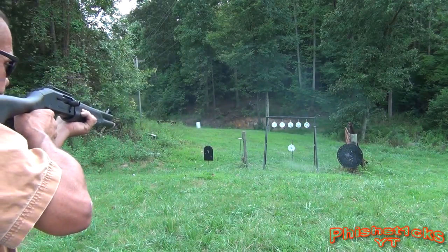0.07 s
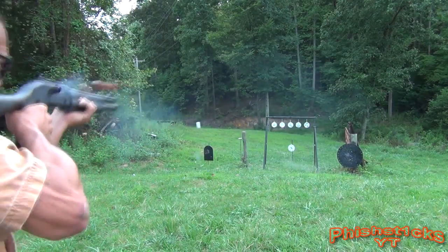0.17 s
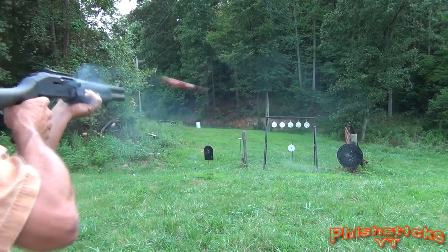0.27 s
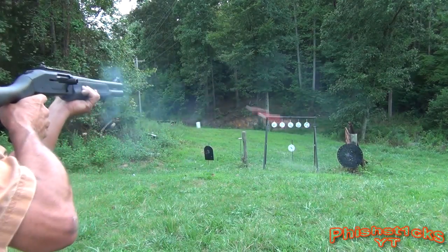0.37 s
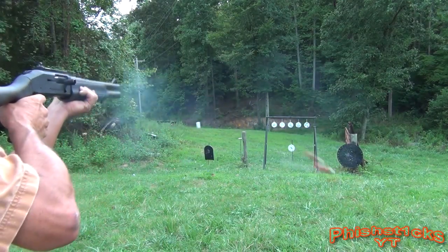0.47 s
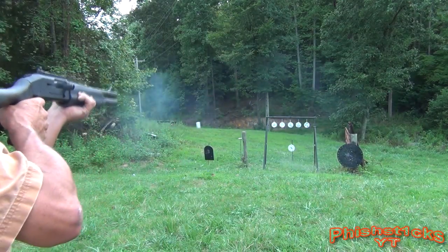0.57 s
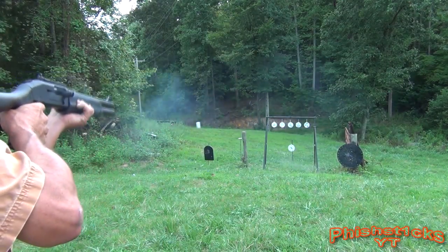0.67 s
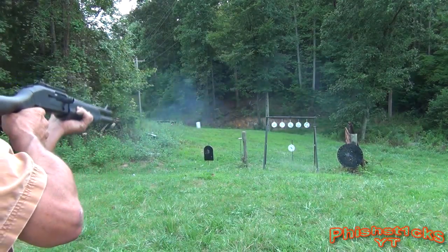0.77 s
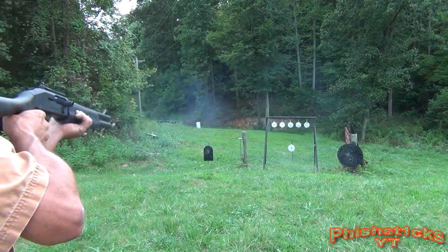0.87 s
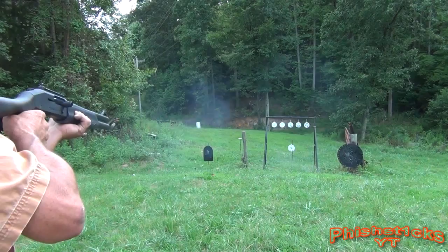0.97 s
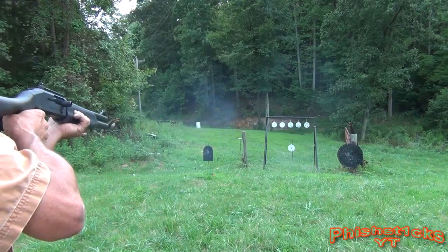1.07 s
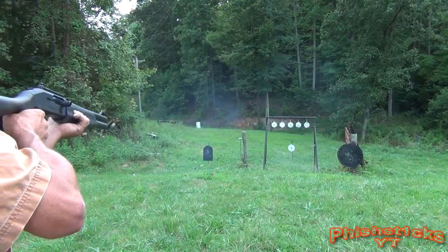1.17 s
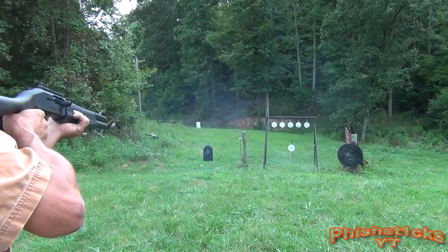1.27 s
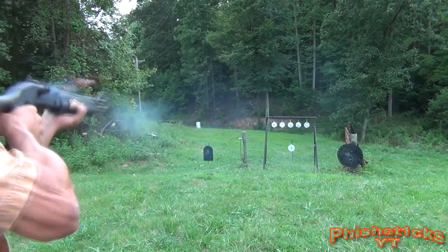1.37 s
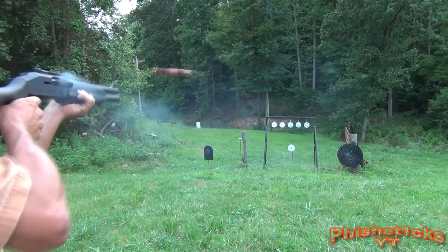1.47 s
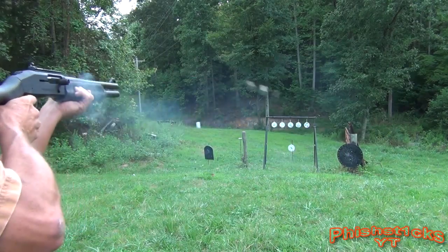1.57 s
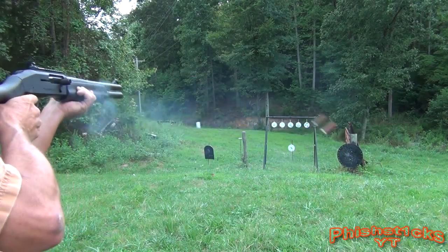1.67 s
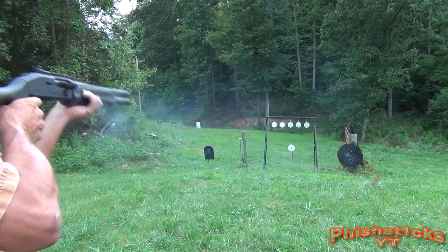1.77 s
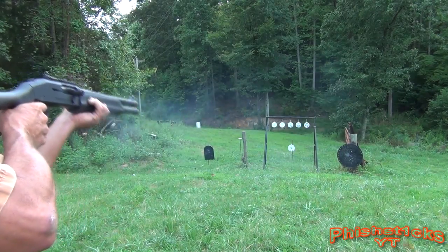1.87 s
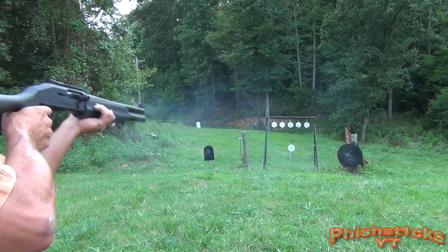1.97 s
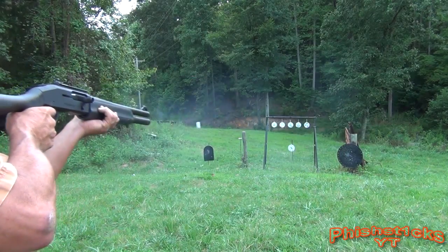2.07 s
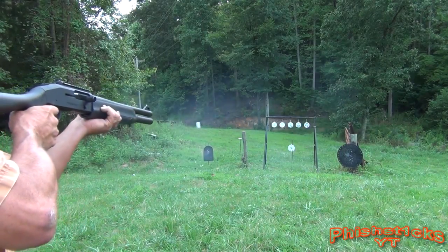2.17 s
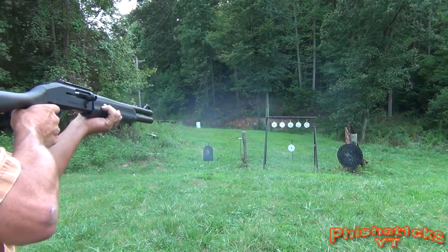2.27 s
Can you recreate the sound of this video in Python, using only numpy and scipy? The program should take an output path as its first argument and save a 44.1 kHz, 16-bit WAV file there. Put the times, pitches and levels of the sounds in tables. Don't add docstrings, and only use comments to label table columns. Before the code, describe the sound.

A close semi-automatic shotgun fires two shots about a second apart on a grassy range; each flat, bright, overloaded blast is followed by a bolt slam, ringing steel and echoes rolling back from surrounding woods.

```python
import sys
import numpy as np
from scipy import signal
from scipy.fft import rfft, irfft
from scipy.io import wavfile
from scipy.ndimage import uniform_filter1d

SR = 44100
rng = np.random.default_rng(int(sys.argv[2]) if len(sys.argv) > 2 else 0)


def to_linear_factor(level_db):
    exponent = np.asarray(level_db, float) / 20
    return 10 ** exponent


def wav_out(sig):
    wavfile.write(sys.argv[1], SR, np.round(np.clip(np.atleast_2d(sig).T, -1, 1) * 32767).astype(np.int16))


N = 101430

SHOT_S = [
    .2015,
    1.41905,
]
# (echo level [dB], roar level [dB], bolt level [dB])
SHOT_LEVELS = [
    (0, -13, -10.5),
    (-.5, -12.5, -11),
]
# (woods level [dB], recovery [dB per s])
RECOVERY = [
    (1.5, 0),
    (0, -8),
]

# (frequency [Hz], level [dB per Hz])
FIELD_TONE = [(40, -54), (110, -26.5), (250, -16.5), (479, -3), (1100, -13.5), (2200, -27), (3650, -36),
              (15000, -45)]
# (frequency [Hz], side against mid [dB])
FAR_WIDTH = [(60, -32), (180, -51), (550, -18.5), (1650, -13), (4970, -11.5), (15000, -22.5)]

# (frequency [Hz], level [dB per Hz])
WOODS_TONE = [(40, -38), (200, -32.5), (372, -3), (542, -1), (760, -6.5), (1180, -5), (4000, -15.5),
              (9000, -26), (15000, -53.5)]
# (frequency [Hz], time to fall 60 dB [s])
WOODS_T60 = [(100, 1.5), (250, 0.9), (450, 2.78), (1000, 2.27), (2000, 1.69), (4000, 1.1), (6000, 0.99),
             (12000, 0.675)]
# (time after shot [s], level [dB])
WOODS_SWELL = [(0, -14), (.15, -14), (.25, -11), (.3, -6), (.37, -3.5), (.45, -1.5), (.55, 0)]

ECHO_S = [.0028, .027, .0575, .0743, .0775, .0815, .098, .1065, .1205, .127, .172, .1835, .2552, .2585,
          .2695, .283, .288, .2975, .308, .3275, .3385, .3425, .3465, .354, .361, .387, .392, .4365, .4445,
          .450]
ECHO_HZ = [1320, 1640, 850, 1050, 400, 880, 1120, 600, 1130, 1230, 910, 810, 850, 800, 990, 850, 650, 1190,
           600, 800, 900, 1000, 750, 700, 900, 590, 580, 800, 900, 1000]
# (level [dB], spread [s])
ECHO_LEVELS = [(-6, .001), (-17, .002), (-18, .002), (-6, .002), (-11, .003), (-5, .0015), (-16, .002),
               (-14, .002), (-14, .002), (-13, .002), (-16, .002), (-10, .004), (-6, .0015), (-11, .003),
               (-8, .003), (-18, .001), (-13, .003), (-14, .002), (-13, .001), (-10, .002), (-10, .003),
               (-7, .002), (-10, .005), (-13, .001), (-7, .002), (-13, .003), (-14, .002), (-11, .003),
               (-14, .004), (-14, .004)]
# (frequency [Hz], level [dB per Hz])
CLAP_TONE = [(50, -45), (120, -13), (400, 3), (1000, -2.5), (2000, -6), (4000, -13.5), (8000, -38),
             (14000, -58.5)]
# (time after shot [s], level [dB], length [s])
GLINTS = [
    (.127, -28, .01),
    (.243, -33, .03),
    (.336, -31, .018),
    (.36, -40, .005),
]

# (time [s], level [dB], length [s])
TICKS = [
    (0.34, -28, 0.00085),
    (0.88, -51, .03),
    (1.192, -58, 0.0031),
    (1.232, -65, 0.0014),
    (1.332, -62, .003),
    (1.549, -12, 0.0012),
    (2.168, -68, .01),
]
# (frequency [Hz], level [dB per Hz])
CLACK_TONE = [(290, -22.5), (500, -16.5), (8310, -6.5), (10500, -19), (11700, -6.5), (15200, -29.5),
              (16800, -41)]

FIRST_HZ = [6718, 6799, 7660, 7773, 8565, 8845, 9405, 5922, 4430, 10487, 5524, 11133, 11423, 11623]
SECOND_HZ = [5524, 5922, 6713, 6853, 7375, 8005, 9394, 10476, 10729, 11400, 11859, 13006, 13474, 14626]
LATE_HZ = [9410, 6802, 8856, 11149, 11429, 11547, 12145, 13700, 6720, 6860, 10530, 11430, 13474, 14626]
# (level [dB], start [s], hold [s])
FIRST_RING = [(-29, .33, .12), (-28, .31, .14), (-29, .33, .12), (-29, .33, .12), (-33, .3, .12),
              (-30, .3, .14), (-19, .288, .065), (-36, .31, .15), (-40, .3, .3), (-31, .31, .11),
              (-38, .39, .16), (-33, .31, .14), (-25, .295, .12), (-29, .33, .12)]
SECOND_RING = [(-36, 1.62, .11), (-28, 1.575, .075), (-21, 1.555, .095), (-25, 1.56, .09), (-29, 1.57, .08),
               (-31, 1.57, .08), (-31, 1.53, .08), (-29, 1.51, .1), (-29, 1.51, .1), (-25, 1.53, .08),
               (-29, 1.52, .09), (-30, 1.51, .05), (-33, 1.51, .05), (-30, 1.52, .05)]
LATE_RING = [(-38, .55, .17), (-55, .84, .11), (-58, .85, .12), (-60, .87, .15), (-55, .79, .07),
             (-62, .87, .1), (-61, .84, .07), (-75, .9, .16), (-43, 1.71, .14), (-52, 1.73, .14),
             (-63, 1.94, .1), (-63, 1.91, .13), (-69, 1.96, .09), (-70, 1.97, .09)]
# (frequency [Hz], level [dB], start [s], hold [s])
MORE_FIRST = [(3838, -43, .33, .25), (6541, -40, .31, .14), (7224, -38, .31, .14), (7596, -37, .32, .13),
              (8005, -33, .3, .17), (9405, -20, .385, .06), (10363, -33, .3, .11), (10422, -33, .3, .11),
              (10750, -36, .3, .13), (10912, -39, .3, .13), (11353, -36, .295, .12),
              (12139, -39, .295, .12), (12204, -36, .295, .11), (13754, -40, .29, .1)]
MORE_SECOND = [(5103, -34, 1.6, .05), (6288, -31, 1.595, .065), (7208, -31, 1.585, .065),
               (7745, -32, 1.53, .115), (8463, -37, 1.55, .09), (8548, -34, 1.55, .09),
               (8845, -34, 1.565, .075), (9238, -36, 1.54, .08), (10085, -39, 1.53, .08),
               (10896, -36, 1.56, .07), (11946, -34, 1.52, .07), (12866, -36, 1.51, .05),
               (13168, -37, 1.51, .05), (14836, -37, 1.52, .05)]
MORE_LATE = [(6799, -50, .5, .24), (7773, -50, .5, .12), (8010, -51, .5, .14), (8850, -52, .52, .12),
             (11623, -57, .5, .15), (12624, -59, .5, .13), (10422, -58, .5, .16), (9415, -68, .88, .12),
             (13684, -65, .5, .17), (14643, -74, .84, .1), (4430, -44, .55, .13), (7386, -52, 1.7, .14),
             (7741, -51, 1.7, .14), (5529, -50, 1.68, .14)]

# (frequency [Hz], level [dB per Hz])
ROAR_TONE = [(24, -59), (40, -36.5), (295, -10.5), (810, -16.5), (1070, -3), (5400, -4.5), (8510, 0),
             (15200, -6.5), (16800, -78.5)]
# (frequency [Hz], time to fall 60 dB [s])
ROAR_T60 = [(100, 1), (500, 1), (2000, 0.93), (6000, 0.74), (12000, 0.84), (16000, 0.51)]
# (frequency [Hz], lowest kept level [dB per bin])
KEPT_TREBLE = [(12000, -112), (13400, -101), (14200, -93), (15000, -86), (15400, -72), (16200, -60)]

WOODS_AT_S, WOODS_DB, WOODS_GRAIN_DB = 0.38, -22.5, 0
BOLT_S, HAMMER_S = .0835, -0.0061


def evened(x):
    return x / np.sqrt(np.mean(x ** 2) + 1e-20)


def read(points, hz):
    f, value = np.transpose(points)
    return np.interp(np.log(hz + 1), np.log(f + 1), value)


def add(mix, s, sound):
    part = mix[..., round(s * SR):][..., :sound.shape[-1]]
    part += sound[..., :part.shape[-1]]


def slow(count, smooth_s):
    size = max(round(smooth_s * SR), 1)
    smooth = uniform_filter1d(rng.standard_normal(count), size)
    return evened(uniform_filter1d(smooth, size))


def grit(count, grain_db, grain_s=0.0019):
    clumps = evened(to_linear_factor(grain_db * slow(count, grain_s)))
    return rng.standard_normal((2, count)) * clumps


def colour(x, tone, t60=None, at_s=0.):
    hz, t, z = signal.stft(x, SR, nperseg=512, noverlap=384)
    shape = evened(to_linear_factor(read(tone, hz)))[:, None]
    if t60:
        shape = shape * to_linear_factor(-60 * (t - at_s) / read(t60, hz)[:, None])
    return signal.istft(z * shape, SR, nperseg=512, noverlap=384)[1][..., :x.shape[-1]]


def causal(tone, size=2048):
    level_db = np.maximum(read(tone, np.fft.rfftfreq(size, 1 / SR)), -100)
    half = np.log(to_linear_factor(level_db))
    whole = np.r_[half, half[-2:0:-1]]
    pulse = np.fft.ifft(np.exp(np.conj(signal.hilbert(whole)))).real[:size // 2]
    return pulse / abs(pulse).max()


def widen(mid_side):
    mid, side = mid_side
    width = to_linear_factor(read(FAR_WIDTH, np.fft.rfftfreq(len(mid), 1 / SR)))
    side = irfft(rfft(side) * width, len(mid))
    return np.array([mid + side, mid - side])


def near(mid_side):
    side = to_linear_factor(-21) * mid_side[1]
    return np.array([mid_side[0] + side, mid_side[0] - side])


def field():
    t = np.arange(N) / SR
    fired = t > SHOT_S[0]
    wings = np.clip(np.sin(2 * np.pi * (31.5 * t + .72)) + 0.45, 0, 1)
    cricket = to_linear_factor(-64) * wings * (t > .036) * np.sin(2 * np.pi * 5850 * t)
    hum = to_linear_factor(-55) * np.sin(2 * np.pi * 191 * t)
    rumble = widen(to_linear_factor(-45.5) * colour(grit(N, grain_db=2), FIELD_TONE))
    return rumble * to_linear_factor(-4 * fired) + (hum + cricket) * to_linear_factor(-30 * fired)


def woods(scatter, db, db_per_s):
    t = np.arange(scatter.shape[1]) / SR
    recovery_db = db + db_per_s * np.clip(t - WOODS_AT_S, 0, 1.3)
    swell_db = np.interp(t, *np.transpose(WOODS_SWELL))
    wash = colour(scatter, WOODS_TONE, WOODS_T60, WOODS_AT_S)
    return widen(wash * to_linear_factor(WOODS_DB + recovery_db + swell_db))


def claps():
    out, pulse = np.zeros((2, SR)), causal(CLAP_TONE)
    draws = rng.random((len(ECHO_LEVELS), 16, 3))
    for s, hz, (db, spread), row in zip(ECHO_S, ECHO_HZ, ECHO_LEVELS, draws):
        at = (np.cumsum(.6 + 0.89 * row[:, 0]) - .6) / (2 * 1.15 * hz)
        swing = -(-1.) ** np.arange(len(at)) * (0.22 + 1.1 * row[:, 1])
        size = swing * np.exp(-(at / spread - .45) ** 2)
        taps = np.zeros((2, 1024))
        taps[:, np.round(at * SR).astype(int) + 20] = size, 0.79 * size * (2 * row[:, 2] - 1)
        wave = signal.oaconvolve(taps, pulse[None])
        add(out, s, to_linear_factor(db + 3.5) * wave / abs(wave[0]).max())
    return widen(out)


def ring(hz, db, start, hold, left_db=-13, t60=0.5, rise=0.0083):
    t = np.arange(SR) / SR
    after = np.maximum(t - hold, 0)
    left = to_linear_factor(left_db - 60 * after / t60 * hz / 9000)
    swell = np.sin(np.pi / 2 * np.minimum(t / rise, 1)) ** 2
    shape = swell * (np.exp(-after / 0.012) + left) / (1 + to_linear_factor(left_db))
    phase = rng.uniform(0, 2 * np.pi, (2, 1)) + .5 * slow(SR, .018)
    level = np.sqrt(2) * to_linear_factor(db + 1.8 * slow(SR, .018))
    return start, near(level * shape * np.sin(2 * np.pi * hz * t + phase))


def late_ring(hz, db, start, hold):
    return ring(hz, db, start, hold, left_db=10, t60=.45, rise=.06)


def clack(db, length):
    t = np.arange(4096) / SR
    burst = colour(rng.standard_normal((2, len(t))), CLACK_TONE)
    return near(burst * to_linear_factor(db) * np.minimum(t / .0004, 1) * np.exp(-(t / length) ** 4))


def roar(db):
    t = np.arange(SR) / SR
    dip_db = -7 * np.exp(-((t - .072) / .017) ** 2)
    rise = np.minimum(t / .003, 1) ** 2
    blast = colour(grit(SR, grain_db=1.2, grain_s=0.00091), ROAR_TONE, ROAR_T60)
    return near(blast * rise * to_linear_factor(db + dip_db))


def scene():
    mix, echo, trunks = field(), claps(), grit(N, WOODS_GRAIN_DB)
    roll = evened(to_linear_factor(.8 * slow(N, .012)))
    for s, (db, roar_db, bolt_db), gain in zip(SHOT_S, SHOT_LEVELS, RECOVERY):
        add(mix, s, to_linear_factor(db) * echo)
        scatter = trunks + 0.66 * grit(N, WOODS_GRAIN_DB)
        add(mix, s, woods(roll * scatter, *gain))
        for delay, glint_db, length in GLINTS:
            add(mix, s + delay, clack(glint_db, length))
        add(mix, s, roar(roar_db))
        add(mix, s + BOLT_S, clack(bolt_db, length=.0045))
        add(mix, s + HAMMER_S, clack(-43.5, length=0.0053))
        for a, b, c in rng.random((24, 3)):
            add(mix, *ring(4400 + 8500 * a, -41 - 6 * b, s + BOLT_S + 0.078 * c, hold=.1))
    for hz, row in zip(FIRST_HZ + SECOND_HZ, FIRST_RING + SECOND_RING):
        add(mix, *ring(hz, *row))
    for hz, row in zip(LATE_HZ, LATE_RING):
        add(mix, *late_ring(hz, *row))
    for row in MORE_FIRST + MORE_SECOND:
        add(mix, *ring(*row))
    for row in MORE_LATE:
        add(mix, *late_ring(*row))
    for s, db, length in TICKS:
        add(mix, s, clack(db, length))
    return mix


def thin(x):
    hz, t, z = signal.stft(x, SR, nperseg=2048, noverlap=1536)
    power = (abs(z) ** 2).mean(0)
    faint = uniform_filter1d(power, size=16, axis=0) < to_linear_factor(2 * read(KEPT_TREBLE, hz))[:, None]
    treble = (hz > KEPT_TREBLE[0][0])[:, None]
    busy = power.sum(0) > to_linear_factor(2 * -37)
    return signal.istft(z * ~(faint & treble & busy), SR, nperseg=2048, noverlap=1536)[1][:, :N]


def band_limit(x):
    return signal.sosfilt(signal.butter(12, 16990, fs=SR, output="sos"), x)


def record(dry):
    high_pass = signal.butter(2, 330, "high", fs=SR)
    side = signal.lfilter(*high_pass, dry[0] - dry[1]) / 2
    ports = dry.mean(0) + np.array([side, -side])
    ceiling = 1.2
    squashed = ceiling * np.tanh(ports / ceiling)
    edge = signal.firwin(127, 16100, window=("kaiser", 7), fs=SR)[None]
    return band_limit(thin(signal.oaconvolve(squashed, edge, "same")))


dry = scene()
out = record(dry)
wav_out(out)
```